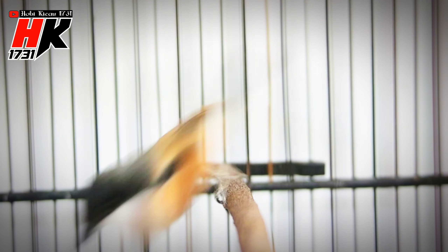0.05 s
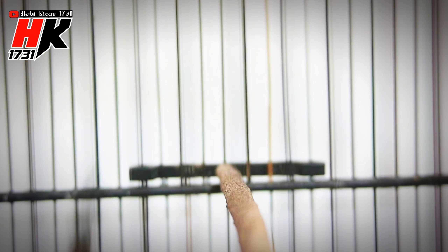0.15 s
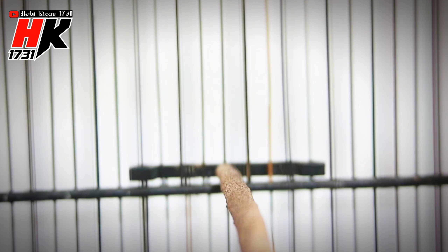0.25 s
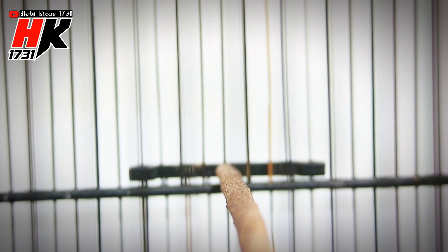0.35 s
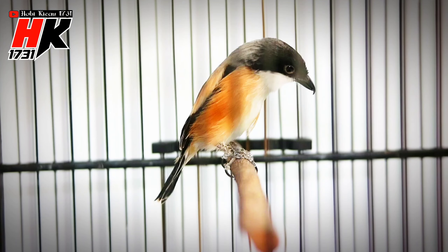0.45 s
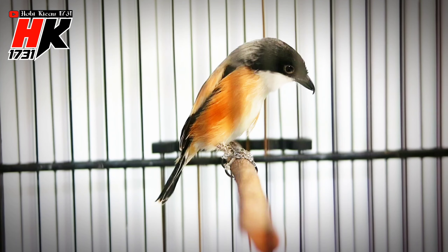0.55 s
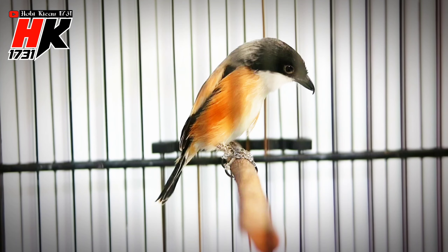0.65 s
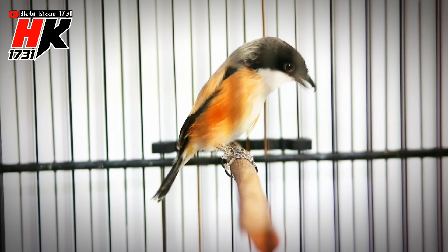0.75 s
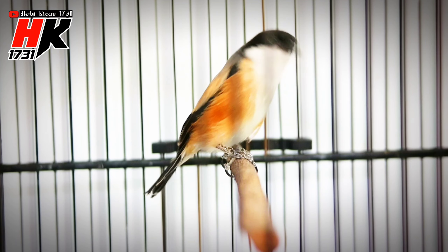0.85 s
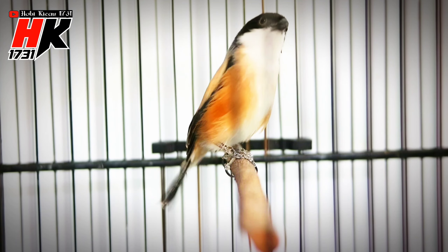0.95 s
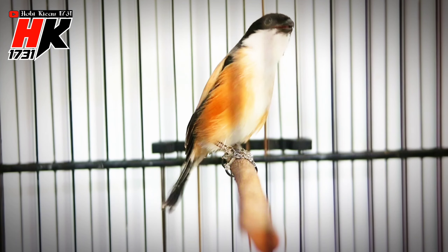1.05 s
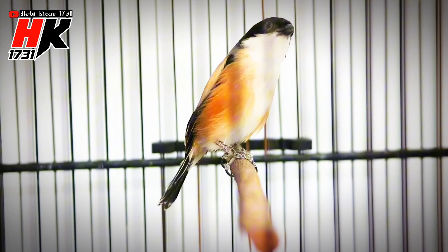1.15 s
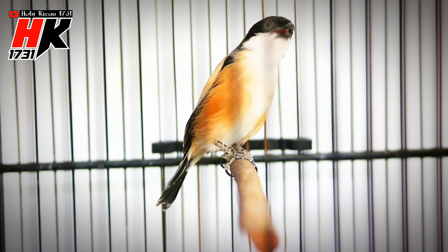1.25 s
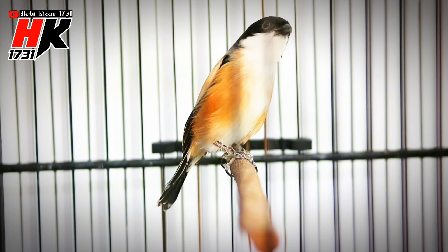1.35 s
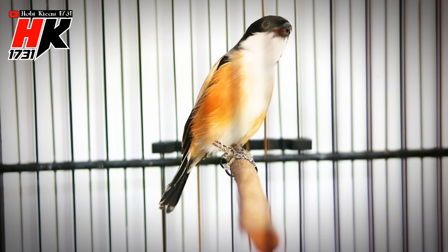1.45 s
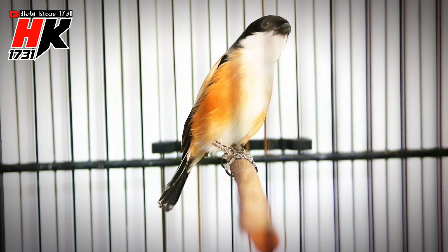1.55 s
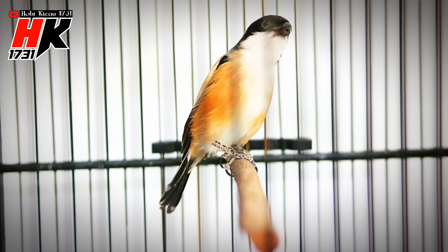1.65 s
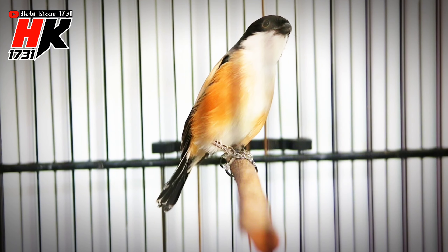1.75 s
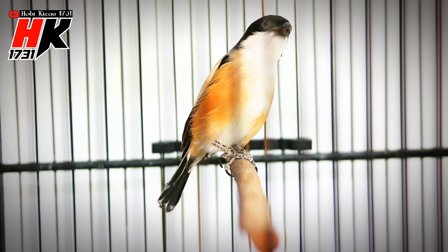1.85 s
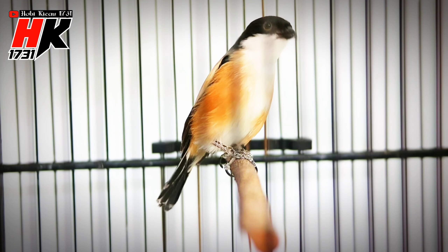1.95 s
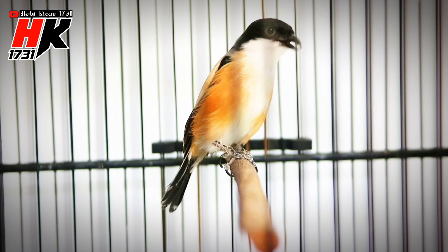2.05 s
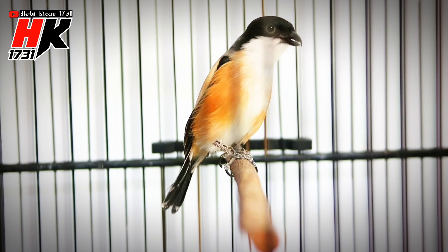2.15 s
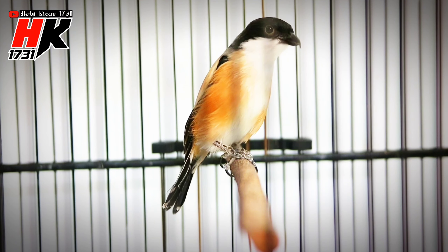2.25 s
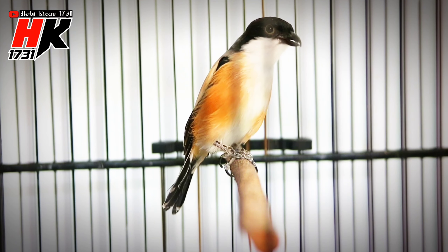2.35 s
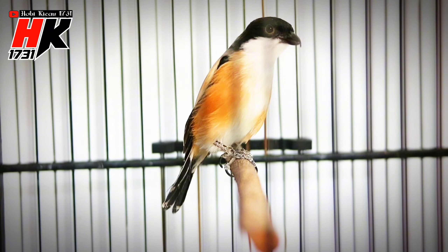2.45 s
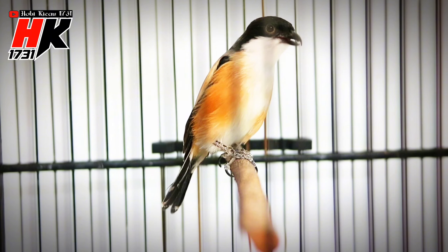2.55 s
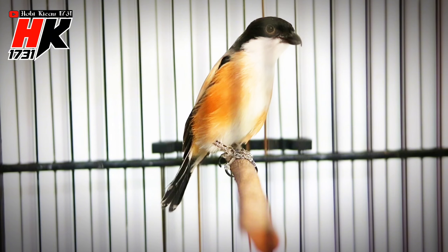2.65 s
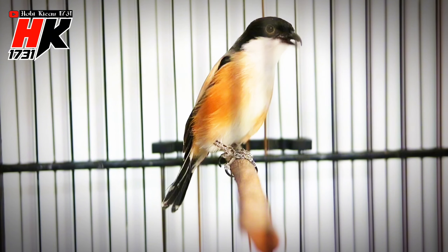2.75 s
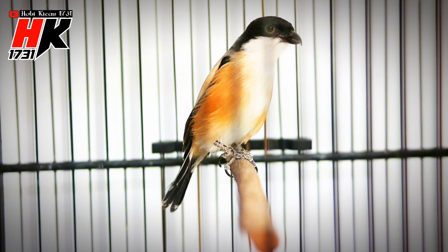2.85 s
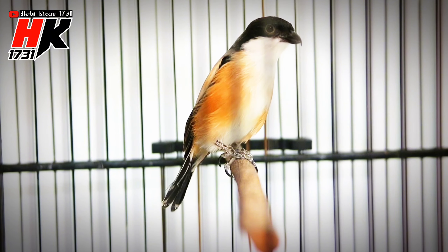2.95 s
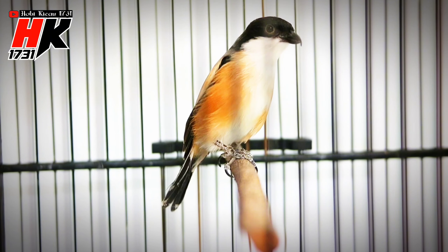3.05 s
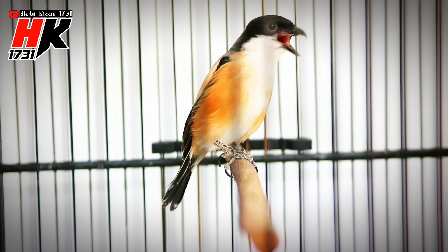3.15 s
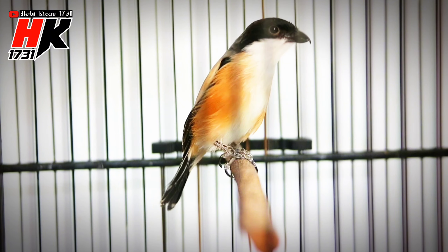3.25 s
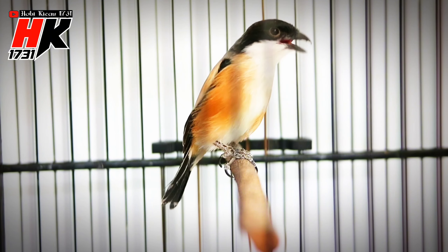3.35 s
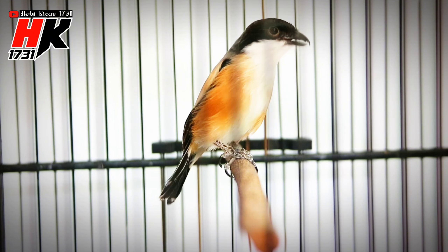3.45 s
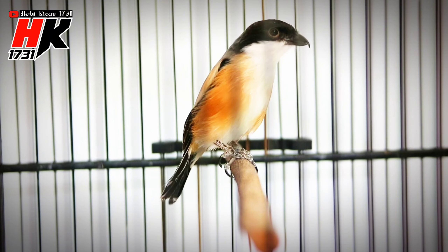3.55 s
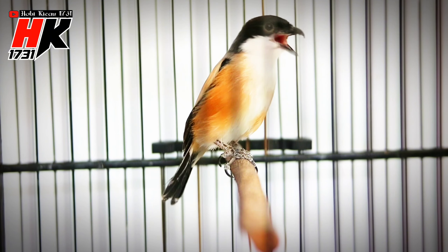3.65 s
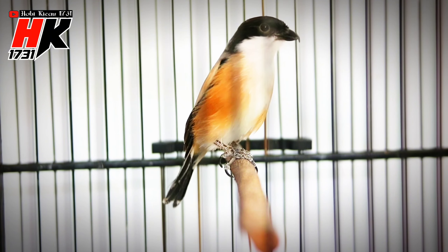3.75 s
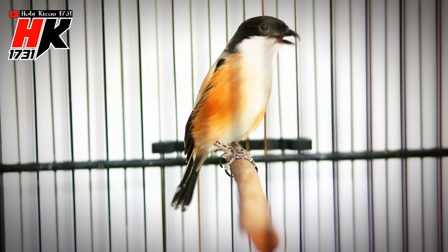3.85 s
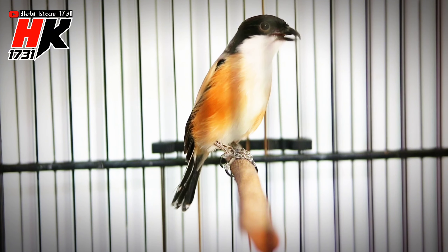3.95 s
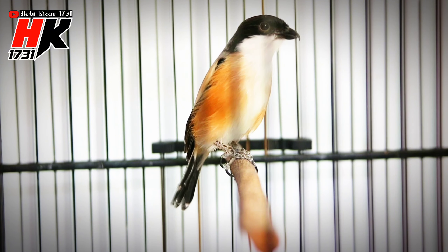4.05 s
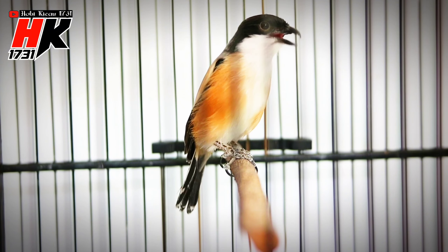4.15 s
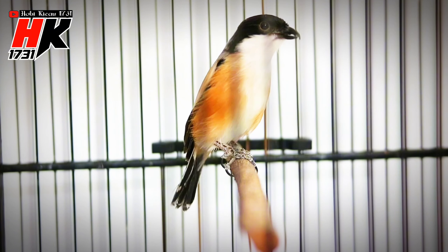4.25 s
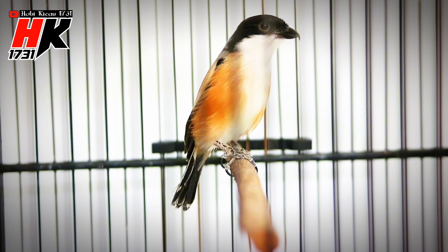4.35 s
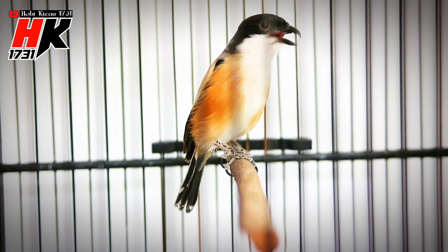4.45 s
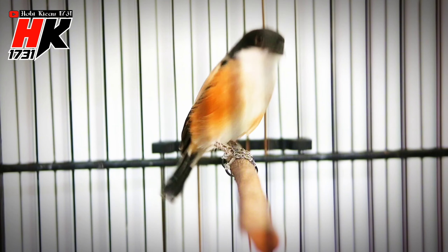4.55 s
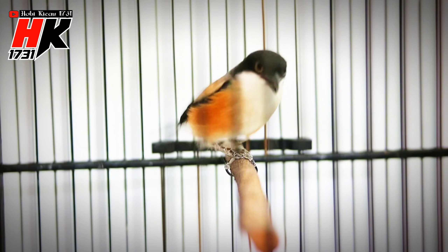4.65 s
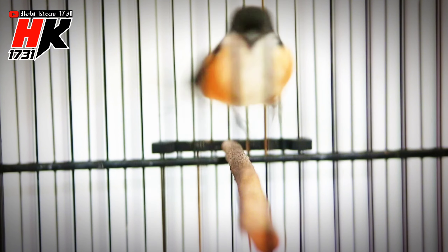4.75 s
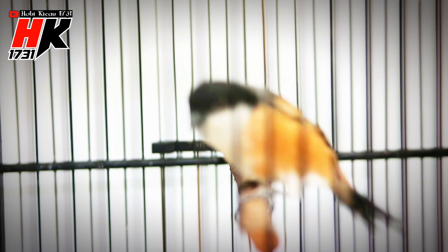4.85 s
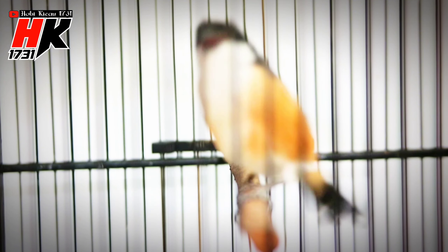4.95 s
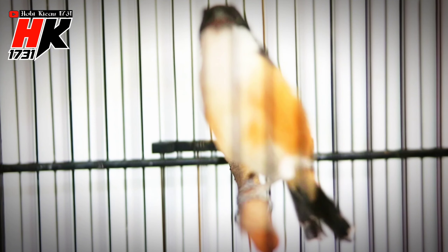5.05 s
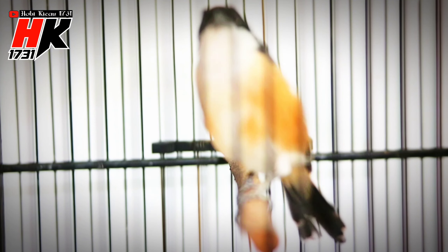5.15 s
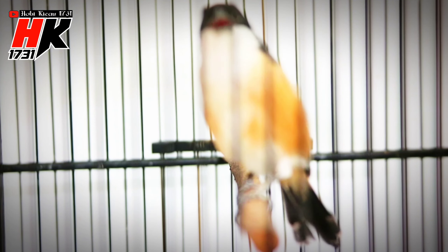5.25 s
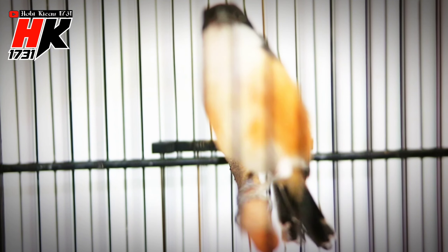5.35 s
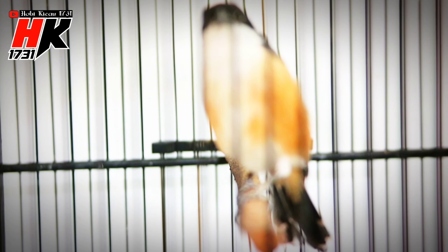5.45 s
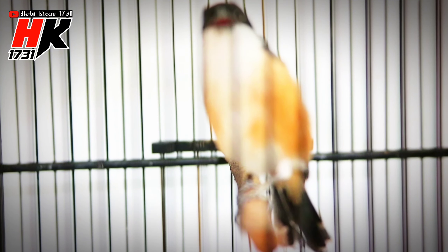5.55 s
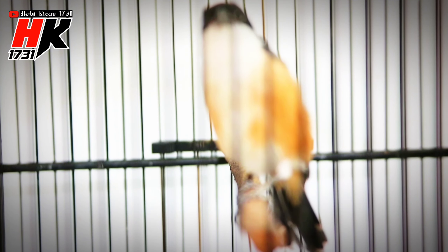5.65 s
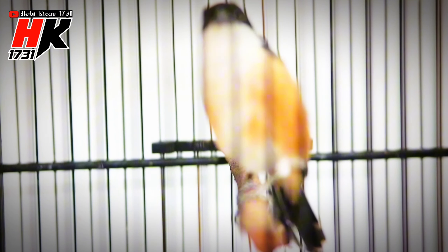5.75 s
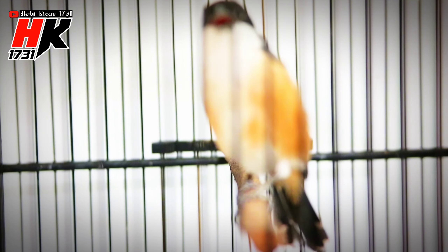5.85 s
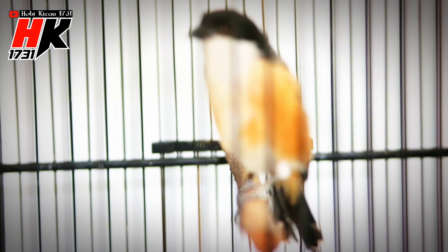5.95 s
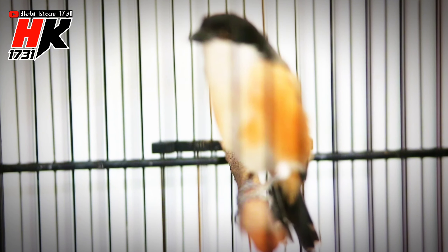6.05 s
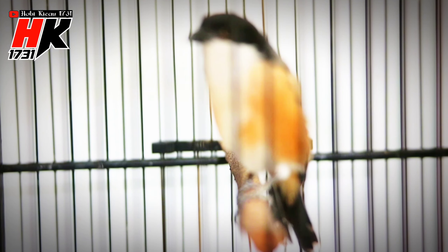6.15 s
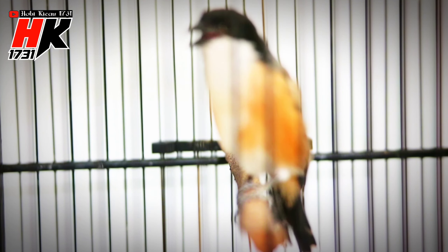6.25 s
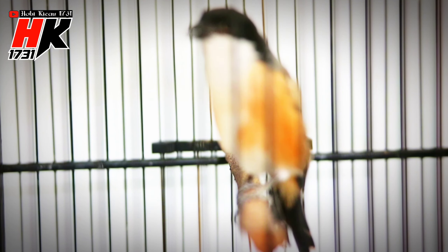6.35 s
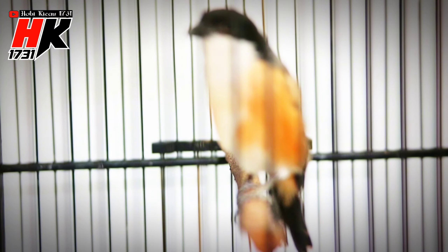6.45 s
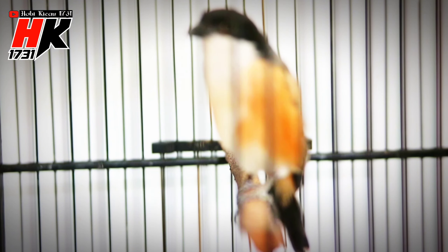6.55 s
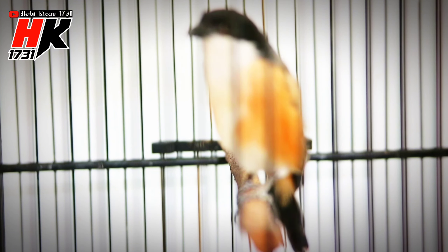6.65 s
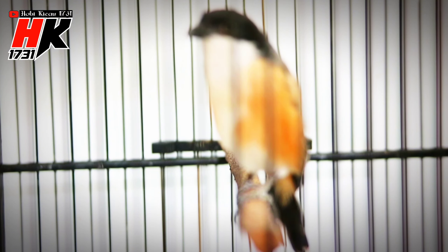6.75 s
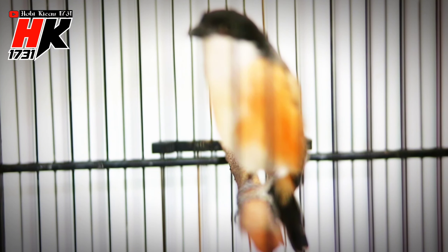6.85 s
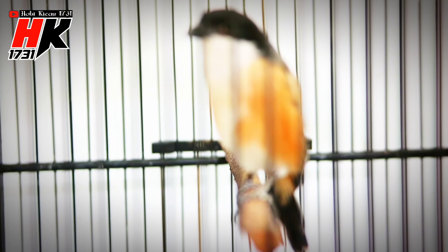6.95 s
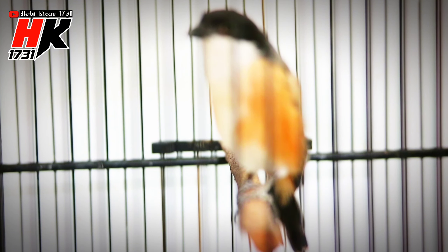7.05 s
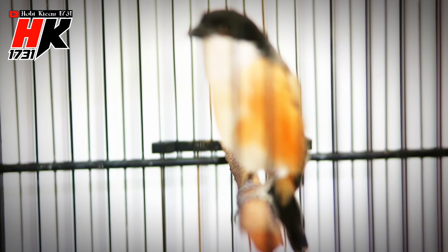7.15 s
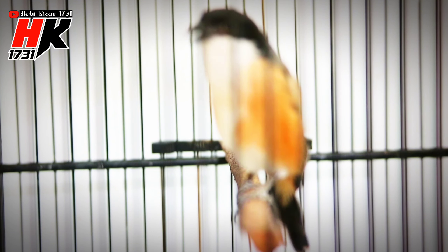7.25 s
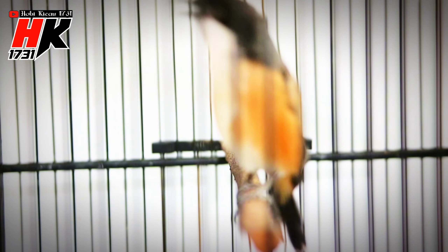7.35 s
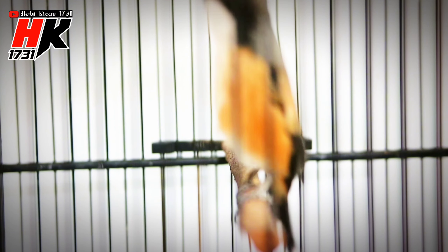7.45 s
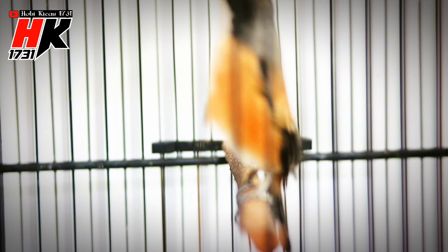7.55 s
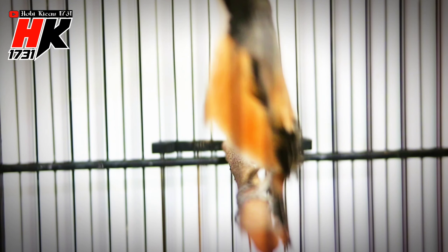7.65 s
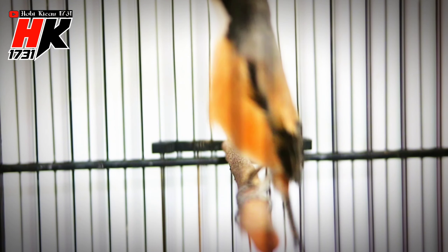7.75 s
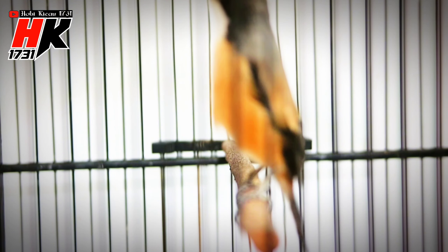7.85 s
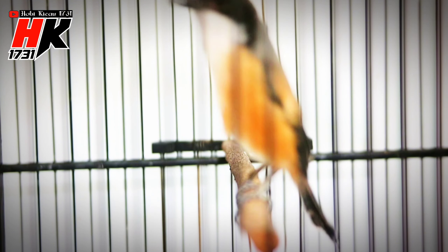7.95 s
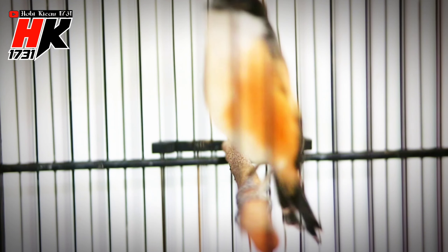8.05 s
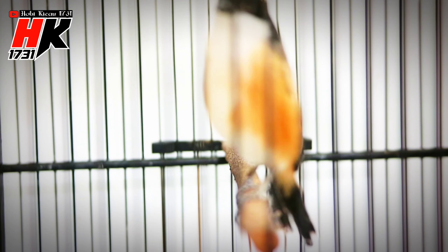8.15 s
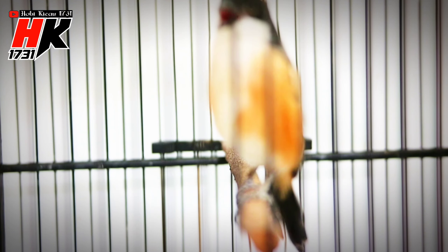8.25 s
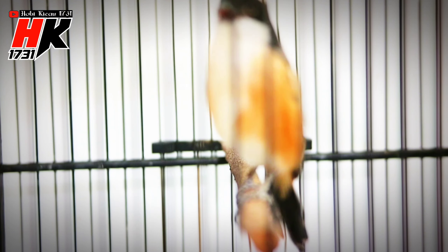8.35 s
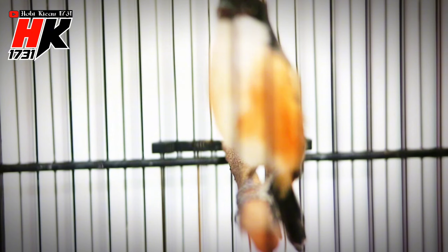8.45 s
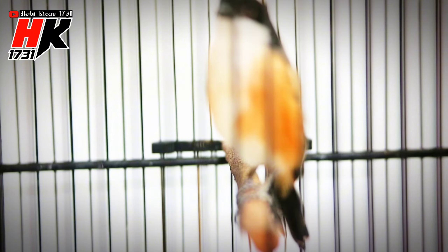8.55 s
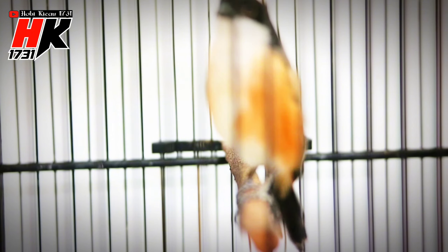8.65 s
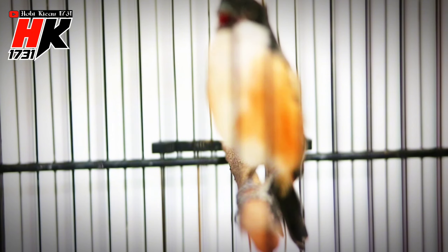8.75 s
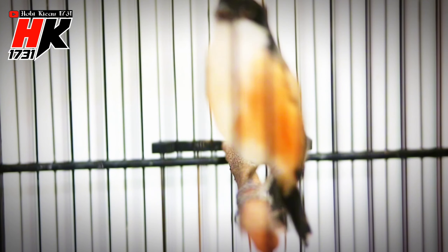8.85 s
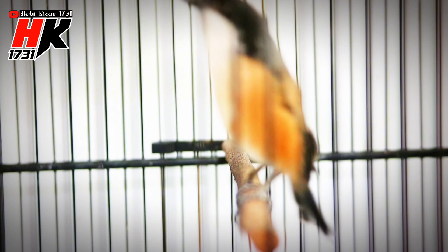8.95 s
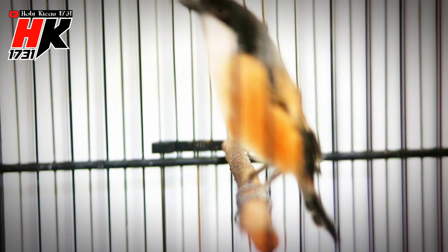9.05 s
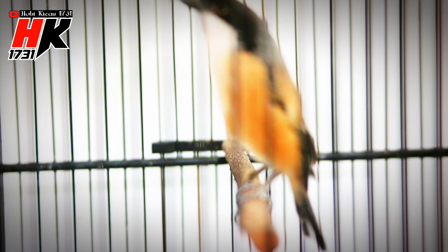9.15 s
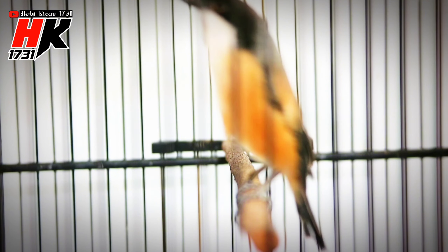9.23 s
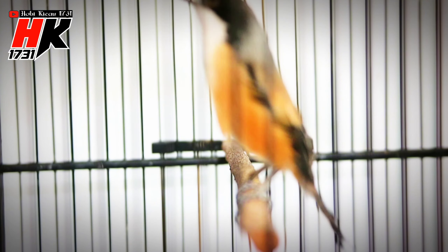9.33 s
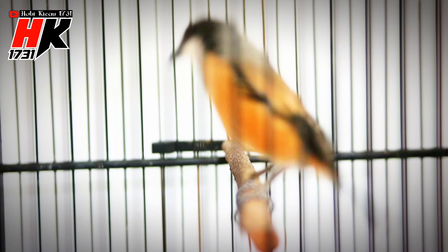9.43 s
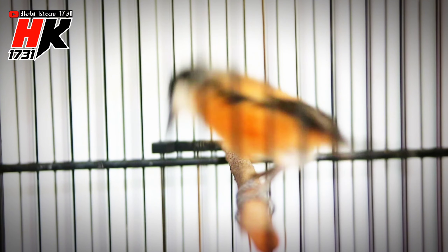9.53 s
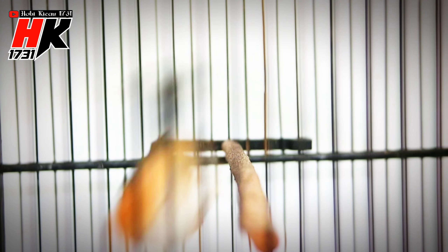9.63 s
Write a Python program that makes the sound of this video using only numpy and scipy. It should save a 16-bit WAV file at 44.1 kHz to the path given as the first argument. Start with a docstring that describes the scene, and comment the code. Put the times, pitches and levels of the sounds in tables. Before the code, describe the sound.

A caged shrike chatters loud falling yelps, alternates clear notes with harsh rasps, then whistles high with rough chucks in a small lively room.

```python
"""A shrike sings in a wire cage in a small, lively room, over the murmur of distant traffic.
After a squeak and a few dry ticks it chatters falling yelps, alternates clear notes with harsh rasps,
pauses, then gives long whistles, most of which end in a rough chuck, and closes on short slurs.
The voice is harmonic synthesis with irregular cycles, shaped by throat and beak; the ticks are noise bursts.
A room response surrounds the bird; filtered noise makes traffic and hiss, and sines make a motor's hum."""
import sys
import numpy as np
from scipy import signal
from scipy.fft import rfft, irfft, next_fast_len
from scipy.io import wavfile
from scipy.ndimage import uniform_filter1d, minimum_filter1d

SR = 44100
rng = np.random.default_rng(int(sys.argv[2]) if len(sys.argv) > 2 else 0)


def int16_out(signal):
    """Quantize to a 16-bit WAV file."""
    q = np.round(np.clip(np.atleast_2d(signal).T, -1, 1) * 32767)
    wavfile.write(sys.argv[1], SR, q.astype(np.int16))


N = 427329
TIME = np.arange(N) / SR
CUTOFF_HZ = 15700   # no harmonic is made above this, and the final filter cuts here


def from_db(db):
    """Level law: 20 dB is a factor of ten in amplitude."""
    return 10 ** (np.asarray(db) / 20)


def rms_one(x):
    """Power normalisation to rms 1."""
    return x / np.sqrt(np.mean(x ** 2) + 1e-20)


def at_hz(points, hz):
    """Logarithmic frequency scale: read a (f/Hz, value) table by linear interpolation in log f."""
    known_hz, values = np.transpose(points)
    return np.interp(np.log(np.maximum(hz, 1)), np.log(known_hz), values)


def noise(colour, size):
    """Spectral shaping: white noise weighted by a spectrum, rms 1."""
    padded = next_fast_len(size)
    white = rfft(rng.standard_normal(padded))
    weights = from_db(at_hz(colour, np.fft.rfftfreq(padded, 1 / SR)))
    return rms_one(irfft(white * weights, padded)[:size])


def flutter(rate_hz, size):
    """Band-limited random modulation: low-passed noise of rms 1, slower than about rate_hz."""
    low_pass = signal.butter(2, min(rate_hz, SR / 4), fs=SR, output="sos")
    settled = signal.sosfilt(low_pass, rng.standard_normal(2 * size))[size:]
    return rms_one(settled)


def add(track, start_s, sound):
    """Linear superposition of a sound on a track."""
    start = max(int(start_s * SR), 0)
    track[start:start + len(sound)] += sound[:max(N - start, 0)]


def ramp(age, start_s, length_s):
    """Linear transition from 0 to 1 over length_s."""
    return np.clip((age - start_s) / max(length_s, .001), 0, 1)


def note_clock(length_s):
    """Local time base: time since a note's start, with a margin for its fade in and out."""
    return np.arange(-.003, length_s + .006, 1 / SR)


def membrane(pitch, rough, throat, jitter, shimmer_db, chaos_hz, tripling):
    """Self-oscillation of one side of the syrinx: harmonics whose cycles turn irregular as it roughens."""
    size = len(pitch)
    unsteady = pitch * (1 + jitter * rough * flutter(chaos_hz, size) + 0.0061 * flutter(120, size))
    phase = 2 * np.pi * np.cumsum(unsteady) / SR
    # cycles group in threes, which puts side tones between the harmonics
    grouping = np.sin(phase / 3 + .7 * flutter(150, size))
    phase = phase + tripling * np.minimum(rough, .4) * grouping
    order = np.arange(1, 10)[:, None]
    weights = from_db(at_hz(throat, order * pitch)) * (order * pitch < CUTOFF_HZ)
    # roughness smothers the upper harmonics
    weights = weights * from_db(-5 * rough * (order > 2))
    tone = np.sum(weights * np.sin(order * phase), axis=0) / np.sqrt(np.sum(weights ** 2, axis=0) / 2)
    shimmer = from_db(shimmer_db * rough * np.tanh(flutter(chaos_hz, size)))
    # keep the mean power over 10 ms unchanged
    return tone * shimmer / np.sqrt(uniform_filter1d(shimmer ** 2, size=441))


def song(notes, throat, jitter, shimmer_db, chaos_hz, tripling, rasp, second_ratio, second_db):
    """Source-filter principle: two syrinx sides and turbulent air, both shaped by throat and beak.

    Roughness brings in the lower-pitched second side and the air."""
    out = np.zeros(N)
    for t, pitch, level_db, rough, gape_db in notes:
        rough = np.clip(rough, 0, 1)
        # a wide beak lets the upper harmonics out
        tract = [(hz, db + gape_db * np.clip(np.log2(hz / 3900) * 2, 0, 2)) for hz, db in throat]
        first = membrane(pitch, rough, tract, jitter, shimmer_db, chaos_hz, tripling)
        second = membrane(pitch * second_ratio, rough, tract, jitter, shimmer_db, chaos_hz, tripling)
        second_share = from_db(second_db) * rough ** 2
        air_share = rasp * rough
        # turbulent air is brighter than the tone and comes in uneven puffs
        hiss = [(hz, db + 6 * (hz > 5000)) for hz, db in tract]
        puffs = from_db(6 * np.tanh(flutter(350, len(t))))
        air = rms_one(noise(hiss, len(t)) * puffs)
        voice = first + second_share * second + air_share * air
        voice = voice / np.sqrt(1 + second_share ** 2 + air_share ** 2)
        gate = np.clip((t - t[0]) / 0.0056, 0, 1) * np.clip((t[-1] - t) / 0.0097, 0, 1)
        add(out, t[0], voice * from_db(level_db) * np.sin(np.pi / 2 * gate) ** 2)
    # so small a beak radiates almost no bass
    return signal.sosfilt(signal.butter(4, 1250, "high", fs=SR, output="sos"), out)


YELP_ATTACK_DB, YELP_ACCENT_S, YELP_ACCENT_DB, YELP_FADE_DB_PER_S = 14, 0.0087, 6.5, 108.5
YELP_SCOOP_S, YELP_FALL_ROUGH, YELP_BREAK_S = 0.0219, .44, .02


def yelp(s, attack_s, hold_s, fall_s, hz, scoop, fall_octaves, peak_db, hold_rough, gape_db):
    """Exponential glide: an accented tone scoops up, holds, then tumbles down and roughens."""
    age = note_clock(hold_s + fall_s)
    scooped = 1 - scoop * (1 - ramp(age, 0, YELP_SCOOP_S))
    pitch = hz * scooped * 2 ** (-fall_octaves * ramp(age, hold_s, fall_s))
    level_db = (peak_db - YELP_ATTACK_DB * (1 - ramp(age, 0, attack_s))
                - YELP_ACCENT_DB * ramp(age, attack_s, YELP_ACCENT_S)
                - YELP_FADE_DB_PER_S * np.maximum(age - attack_s, 0))
    broken = ramp(age, hold_s - YELP_BREAK_S / 2, YELP_BREAK_S)
    return s + age, pitch, level_db, hold_rough + (YELP_FALL_ROUGH - hold_rough) * broken, gape_db


SAG_AT_S, SAG_WIDTH_S = 0.0195, 0.0175
CLEAR_ATTACK_DB, CLEAR_FADE_DB_PER_S, FRAY_LOSS_DB = 10.5, 32.5, 3
CLEAR_ROUGH, FRAY_S = 0.074, 0.018


def clear_note(s, attack_s, clear_s, frayed_s, hz, sag, last_hz, db, frayed_rough, gape_db):
    """Near-periodic oscillation: a held, clean tone sags briefly, then slides with a frayed end."""
    age = note_clock(clear_s + frayed_s)
    sagged = 1 - sag * np.exp(-((age - SAG_AT_S) / SAG_WIDTH_S) ** 2)
    pitch = hz * sagged + (last_hz - hz) * ramp(age, clear_s, frayed_s)
    frayed = ramp(age, clear_s, FRAY_S)
    level_db = (db - CLEAR_ATTACK_DB * (1 - ramp(age, 0, attack_s))
                - CLEAR_FADE_DB_PER_S * age - FRAY_LOSS_DB * frayed)
    return s + age, pitch, level_db, CLEAR_ROUGH + (frayed_rough - CLEAR_ROUGH) * frayed, gape_db


# All song levels are those at the bird, before the room; gape is treble/dB, acting above 3.9 kHz.
# Falling yelps: start t/s, attack t/s, onset to fall t/s, fall t/s, held f/Hz, scoop [share of f],
# fall [octaves], peak level/dB, roughness of the hold [0-1], gape/dB
FALLING_YELPS = [ (0.835, 0.012, .025, 0.046, 1867, .02, 0.4, -4, .06, 0),
                 (1.054, 0.044, 0.053, .031, 1837, 0.018, 0.39, -4.5, 0.09, 1.5),
                 (1.275, 0.017, 0.034, .04, 1861, 0.094, 0.51, -3.5, 0.07, 1.5),
                 (1.492, .019, 0.032, 0.046, 1723, 0.044, .4, -3.5, 0.19, 2.5),
                 (1.711, 0.0075, 0.043, 0.04, 1616, .07, 0.33, -3.5, 0.24, 1),
                 (1.933, 0.012, 0.044, 0.044, 1544, 0.045, 0.34, -4.5, .19, 1),
                 (2.151, 0.012, 0.052, 0.028, 1533, 0.046, 0.29, -4.5, 0.15, -0.5),
                 (2.376, 0.015, 0.043, 0.041, 1539, 0.044, 0.31, -4.5, 0.18, -0.5),
                 (2.608, 0.012, 0.046, 0.036, 1537, 0.042, .33, -4, .19, -1),
                 (2.832, 0.0091, 0.045, .037, 1520, 0.045, 0.31, -4.5, 0.2, -1), ]
# Clear notes: start t/s, attack t/s, clear t/s, frayed t/s, f/Hz, sag [share of f], last f/Hz,
# level/dB, roughness of the frayed end [0-1], gape/dB
HELD_NOTES = [ (3.16, 0.018, .022, 0.081, 1935, 0.036, 2064, -7, 0.54, 4.5),
              (3.428, 0.023, 0.065, 0.019, 1886, 0.038, 1550, -9.5, 0.18, 4),
              (3.671, 0.03, 0.075, 0.017, 1885, .075, 1670, -9.5, 0.17, 3),
              (4.193, 0.0087, 0.076, 0.024, 1552, 0.0033, 1470, -8.5, 0.5, -1.5),
              (4.735, 0.015, .076, .027, 1595, 0.0196, 1443, -10, 0.24, 0),
              (5.298, 0.013, .076, 0.038, 1539, 0.0031, 1360, -12, 0.19, 2),
              (5.888, 0.0093, 0.077, 0.037, 1564, 0.036, 1413, -10, 0.26, 1.5), ]
# Throat and beak response for high yelps and clear notes: f/Hz, level/dB
OPEN_THROAT = [(1200, -16.5), (1550, -23.5), (1900, -26), (2300, -34.5), (2750, 2), (3100, -0.5),
               (3900, -5), (4650, -9.5), (5500, -21.5), (6300, -24.5), (7500, -23.5), (9700, -49),
               (11800, -42.5), (15500, -69.5)]
# Darker throat and beak response for low yelps: f/Hz, level/dB
DARK_THROAT = [(1200, -11.5), (1550, -22.5), (2000, -9), (2500, 2), (3050, -3.5), (3700, -8), (4600, -20),
               (5400, -25.5), (7600, -29.5), (9500, -65), (12000, -46), (15500, -58)]
LOW_YELP_HZ = 1570   # below this the throat takes the darker shape


def chatter():
    """Vocal-tract resonance: yelps and clear notes, the low yelps through a darker throat."""
    high_yelps = [yelp(*row) for row in FALLING_YELPS if row[4] >= LOW_YELP_HZ]
    low_yelps = [yelp(*row) for row in FALLING_YELPS if row[4] < LOW_YELP_HZ]
    clear_notes = [clear_note(*row) for row in HELD_NOTES]
    bright = song(high_yelps + clear_notes, OPEN_THROAT, jitter=.05, shimmer_db=8, chaos_hz=450,
                  tripling=.55, rasp=.4, second_ratio=.78, second_db=-5)
    dark = song(low_yelps, DARK_THROAT, jitter=.055, shimmer_db=8, chaos_hz=500,
                tripling=.85, rasp=.5, second_ratio=.83, second_db=-6)
    return bright + dark


SCOLD_ATTACK_S, SCOLD_ATTACK_DB, SCOLD_HOLD_S, SCOLD_FADE_DB_PER_S = 0.021, 7, 0.037, 127.5
SCOLD_ROUGH, SCOLD_ROUGHENS_PER_S = 0.4, 6.7
SCOLD_RASP_HZ, SCOLD_SWEEP_S = 1979, 0.00906


def scold(s, length_s, first_hz, sweep_at_s, peak_db, gape_db):
    """Loss of periodicity: a voiced start sweeps up into a rasp that roughens as it fades."""
    age = note_clock(length_s)
    swept = (1 + np.tanh((age - sweep_at_s) / SCOLD_SWEEP_S)) / 2
    pitch = first_hz + (SCOLD_RASP_HZ - first_hz) * swept
    level_db = (peak_db - SCOLD_ATTACK_DB * (1 - ramp(age, 0, SCOLD_ATTACK_S))
                - SCOLD_FADE_DB_PER_S * np.maximum(age - SCOLD_HOLD_S, 0))
    return s + age, pitch, level_db, SCOLD_ROUGH + SCOLD_ROUGHENS_PER_S * age, gape_db


# Scolds: start t/s, length t/s, first f/Hz, middle of sweep after t/s, peak level/dB, gape/dB
RASPING_SCOLDS = [(3.936, 0.12, 1693, .03, -10, -2.5), (4.473, 0.12, 1600, .02, -10, -3),
                  (5.009, 0.11, 1667, .028, -10.5, -1.5), (5.598, .112, 1625, .024, -8.5, -1.5),
                  (6.289, 0.12, 1615, 0.025, -9, -2.5)]
# Throat and beak response while scolding: f/Hz, level/dB
RASP_THROAT = [(1200, -65), (1700, -18), (2200, -30.5), (2850, 8.5), (3300, -3), (3950, 2), (4500, -0.5),
               (5400, -20.5), (7300, -8.5), (8500, -24.5), (10000, -51.5), (12000, -30), (15500, -66.5)]


def scolding():
    """Chaotic oscillation: the harsh rasps, strongly shimmering and with a strong second side."""
    return song([scold(*row) for row in RASPING_SCOLDS], RASP_THROAT, jitter=.035, shimmer_db=11,
                chaos_hz=330, tripling=.3, rasp=.45, second_ratio=.73, second_db=-2)


LEAP_FROM, LEAP_OVER, LEAP_S, SETTLE_S = .47, 1.14, 0.021, .041   # pitch ratios; times from the start
LEAP_ROUGH, WHISTLE_ROUGH, BOW_LOWEST_S = 0.714, 0.083, .122
LEAP_ATTACK_DB, SWELL_S, WHISTLE_RELEASE_DB = 9, 0.045, 14


def whistle(s, length_s, hz, bow, leap_db, lull_db, swell_at_s, swell_db, last_rough, gape_db):
    """Pitch overshoot: a rough leap settles on a purer, bowed tone that lulls, swells and lets go."""
    age = note_clock(length_s)
    leap = np.interp(age, [0, LEAP_S, SETTLE_S], [LEAP_FROM, LEAP_OVER, 1])
    pitch = hz * leap * (1 + bow * (age - BOW_LOWEST_S) ** 2)
    released = ramp(age, swell_at_s, length_s - swell_at_s)
    level_db = (leap_db - LEAP_ATTACK_DB * (1 - ramp(age, 0, LEAP_S))
                + (lull_db - leap_db) * ramp(age, SETTLE_S, SWELL_S)
                + (swell_db - lull_db) * ramp(age, swell_at_s - SWELL_S, SWELL_S)
                - WHISTLE_RELEASE_DB * released)
    rough = np.interp(age, [LEAP_S, SETTLE_S], [LEAP_ROUGH, WHISTLE_ROUGH])
    rough = rough + (last_rough - WHISTLE_ROUGH) * released
    return s + age, pitch, level_db, rough, gape_db


DIVE_TOP_HZ, DIVE_BOTTOM_HZ, DIVE_ARCH_DB, DIVE_ROUGH = 4400, 2374, 17.5, 0.523
REBOUND_RISE_S, REBOUND_SAG_HZ_PER_S = .017, 10460
REBOUND_FADE_DB_PER_S, REBOUND_ROUGH = 166, 0.38


def chuck(s, dive_s, rebound_s, rebound_hz, dive_db, rebound_db, gape_db):
    """Rapid frequency modulation: a loud dive, then a rebound that sags and fades."""
    age = note_clock(dive_s + rebound_s)
    dived, risen = ramp(age, 0, dive_s), ramp(age, dive_s, REBOUND_RISE_S)
    after_s = np.maximum(age - dive_s - REBOUND_RISE_S, 0)
    pitch = (DIVE_TOP_HZ + (DIVE_BOTTOM_HZ - DIVE_TOP_HZ) * dived
             + (rebound_hz - DIVE_BOTTOM_HZ) * risen - REBOUND_SAG_HZ_PER_S * after_s)
    dive_level_db = dive_db - DIVE_ARCH_DB * np.abs(2 * dived - 1)
    level_db = dive_level_db * (1 - risen) + rebound_db * risen - REBOUND_FADE_DB_PER_S * after_s
    return s + age, pitch, level_db, DIVE_ROUGH + (REBOUND_ROUGH - DIVE_ROUGH) * risen, gape_db


SLUR_EASE, SLUR_ARCH_DB = 2.1, 8


def slur(s, length_s, first_hz, last_hz, peak_db, rough, gape_db):
    """Decelerating glide: quick at first and loudest in the middle."""
    age = note_clock(length_s)
    done = ramp(age, 0, length_s)
    pitch = last_hz + (first_hz - last_hz) * (1 - done) ** SLUR_EASE
    level_db = peak_db - SLUR_ARCH_DB * (2 * done - 1) ** 2
    return s + age, pitch, level_db, np.full(len(age), rough), gape_db


# Long whistles: start t/s, length t/s, lowest f/Hz once settled, bow [share of f per s^2],
# leap level/dB, lull level/dB, swell complete after t/s, swell level/dB, last roughness [0-1], gape/dB
LONG_WHISTLES = [ (7.314, 0.15, 3864, 4.6, -13, -19, .146, -5.5, 0.17, -0.5),
                 (7.78, 0.2, 4130, 13.1, -16.5, -18, 0.13, -14.5, 0, -2),
                 (8.271, 0.15, 4086, 11.1, -14.5, -17.5, 0.14, -11.5, 0.2, -1.5),
                 (8.744, .174, 4066, 13, -17, -21.5, 0.13, -11, 0.05, -1),
                 (9.324, 0.21, 3289, 6.5, -20, -30, 0.14, -6.5, 0.56, -3), ]
# Chucks: start t/s, dive t/s, rebound t/s, rebound f/Hz, dive level/dB, rebound level/dB, gape/dB
ROUGH_CHUCKS = [ (7.494, 0.035, 0.043, 2875, -6.5, -10.5, 0), (7.968, 0.027, 0.057, 3648, -5, -10.5, -2),
                (8.453, .026, .055, 3510, -5, -10.5, -1.5), (8.928, 0.029, 0.039, 3603, -3.5, -10, -1.5), ]
# Slurs: start t/s, length t/s, first f/Hz, last f/Hz, peak level/dB, roughness [0-1], gape/dB
SHORT_SLURS = [(6.825, 0.05, 2800, 2405, -31.5, 0.8, 7), (9.543, .04, 2470, 2300, -21.5, 0.83, -14),
               (9.591, .031, 1663, 3770, -8, 0.23, -5)]
# Throat and beak response while whistling: f/Hz, level/dB
PURE_THROAT = [(1400, -75), (2300, 18.5), (3000, 25.5), (4200, 7), (5200, 2.5), (6500, 1), (8300, -10),
               (10000, -24.5), (12200, -21.5), (15500, -65)]


def whistling():
    """Resonance near the fundamental: whistles, chucks and slurs with weak upper harmonics."""
    notes = [whistle(*row) for row in LONG_WHISTLES]
    notes += [chuck(*row) for row in ROUGH_CHUCKS]
    notes += [slur(*row) for row in SHORT_SLURS]
    return song(notes, PURE_THROAT, jitter=0.135, shimmer_db=1, chaos_hz=530,
                tripling=0, rasp=0.21, second_ratio=0.6, second_db=-15.0)


# Contour of the opening squeak: t/s, f/Hz, level/dB, roughness [0-1]
SQUEAK_CONTOUR = [(.003, 2650, -27, 0.25), (.018, 2834, -16, 0.81), (.028, 3093, -6, 0.04),
                  (0.037, 2915, -15, 0.28), (.048, 2820, -18, 0.32)]
# Throat and beak response for the squeak: f/Hz, level/dB
SHRILL_THROAT = [(1500, -41), (3000, -18), (4300, -46), (6000, -5), (7500, -21), (9000, -26.5),
                 (12000, -42), (15500, -47)]


def squeak():
    """Frequency modulation: a brief, shrill arch of pitch."""
    s, *columns = np.transpose(SQUEAK_CONTOUR)
    t = s[0] + note_clock(s[-1] - s[0])
    note = (t, *[np.interp(t, s, column) for column in columns], 0)
    return song([note], SHRILL_THROAT, jitter=0.065, shimmer_db=7.0, chaos_hz=507,
                tripling=0, rasp=0.24, second_ratio=0.97, second_db=-29)


# Dry ticks: t/s of the peak, envelope peak level/dB before the room, decay time constant t/s
BILL_TICKS = [(.476, -28.5, 0.017), (.49, -20, 0.0034), (0.612, -12.5, 0.0027), (.732, -18.5, .003)]
# Spectrum of a tick: f/Hz, level/dB
TICK_SPECTRUM = [(300, -46), (1200, -16), (2000, -15), (3800, -6.5), (5400, -4.5), (6500, -10),
                 (8300, -12.5), (10000, -20), (12500, -28), (15500, -57)]


def ticks():
    """Impulsive excitation: very short toneless bursts from the bill."""
    out, t = np.zeros(N), np.arange(SR // 10) / SR
    lead_s = .01   # room for the rise before each peak
    for s, peak_db, decay_s in BILL_TICKS:
        rise, decay = np.exp((t - lead_s) / (.3 * decay_s)), np.exp((lead_s - t) / decay_s)
        add(out, s - lead_s, from_db(peak_db) * np.minimum(rise, decay) * noise(TICK_SPECTRUM, len(t)))
    return out


# Reverberation time of the diffuse tail, the time to fall 60 dB: f/Hz, t/s
REVERBERATION = [(1000, 0.64), (3200, 0.62), (6000, 0.48), (9000, 0.32), (15000, 0.67)]


def room(x, direct_db, early_db, early_t60, tail_db, lag_s):
    """Reverberation: direct sound, quick scatter from nearby surfaces and a diffuse tail.

    Scatter and tail differ at each microphone; the direct sound reaches the right one lag_s late."""
    t = np.arange(int(.8 * SR)) / SR
    edges = np.geomspace(700, 16000, num=9)
    heard = []
    for side in range(2):
        tail = 0
        for low, high in zip(edges, edges[1:]):
            band_pass = signal.butter(2, [low, high], "band", fs=SR, output="sos")
            band = signal.sosfilt(band_pass, rng.standard_normal(len(t)))
            tail = tail + band * from_db(-60 * t / at_hz(REVERBERATION, np.sqrt(low * high)))
        tail *= np.clip((t - .006) / 0.0077, 0, 1)
        # sparse random reflections, about 900 per second
        arrivals = (rng.random(len(t)) < 900 / SR) * (t > .001)
        early = rng.standard_normal(len(t)) * arrivals * from_db(-60 * t / early_t60)
        response = from_db(tail_db) * tail / np.linalg.norm(tail)
        response = response + from_db(early_db) * early / np.linalg.norm(early)
        direct = np.interp(TIME - side * lag_s, TIME, x)
        heard.append(from_db(direct_db) * direct + signal.fftconvolve(x, response)[:N])
    return np.array(heard)


def wide_noise(colour, left_db):
    """Diffuse field: noise unrelated at the two microphones, left_db louder on the left."""
    return np.array([noise(colour, N), noise(colour, N)]) * from_db([[left_db / 2], [-left_db / 2]])


# Spectrum of the distant traffic: f/Hz, level/dB per Hz
TRAFFIC_SPECTRUM = [(20, -2.5), (45, -3), (90, 1), (140, 8), (230, 2), (380, 4.5), (600, -2), (1000, -7),
                    (2000, -13), (5000, -51.5)]
# Level of the low background rumble, which drops abruptly, often just after a loud note, then climbs
# back: t/s, level/dB before the gain, random drift and left-right balance
RUMBLE_LEVELS = [(0.0, -48), (0.05, -59.5), (0.83, -35), (0.89, -50), (1.67, -42.5), (3.18, -40.5),
                 (3.21, -49.5), (4.1, -50.5), (4.21, -41.5), (5.05, -43.5), (5.1, -54.5), (5.56, -36),
                 (5.69, -49), (6.21, -34), (6.4, -51), (6.69, -39), (9.28, -38.5), (9.69, -42)]
TRAFFIC_GAIN_DB = -0.85


def traffic():
    """Spectrally shaped noise: a low rumble drops abruptly and climbs back, with a small random drift."""
    level_db = np.interp(TIME, *np.transpose(RUMBLE_LEVELS)) + TRAFFIC_GAIN_DB + 2.0 * flutter(5.7, N)
    return from_db(level_db) * wide_noise(TRAFFIC_SPECTRUM, left_db=7)


# Spectrum of the hiss: f/Hz, level/dB per Hz
AIR_SPECTRUM = [(100, -11), (600, 2), (1200, 2), (2200, 1.5), (4000, -5.5), (7000, -15), (9000, -28.5),
                (12000, -32), (15500, -43)]
# Level of the hiss, which rises, steps up near 0.46 s, then changes slowly:
# t/s, level/dB before the left-right balance
AIR_LEVELS = [(0, -51.5), (.45, -46), (.48, -43.5), (5, -47.5), (9.69, -46)]


def air_hiss():
    """Broadband noise: a diffuse hiss rises, steps up near 0.46 s, then changes slowly in level."""
    return from_db(np.interp(TIME, *np.transpose(AIR_LEVELS))) * wide_noise(AIR_SPECTRUM, left_db=5.5)


# Tones of a motor: f/Hz, rms level/dB before the left-right balance
MOTOR_TONES = [(134, -62.5), (200, -59), (474, -56.5), (592, -60.5)]


def motor_hum():
    """Discrete line spectrum: a motor's sine tones with slowly wandering phase, louder on the left."""
    hum = np.zeros(N)
    for hz, db in MOTOR_TONES:
        hum += from_db(db) * np.sqrt(2) * np.sin(2 * np.pi * hz * TIME + 1.5 * flutter(2.28, N))
    return hum * from_db([[2.5], [-4]])


def scene():
    """Superposition: one bird in its room, heard a little to the left, over the background."""
    dry_bird = chatter() + scolding() + whistling() + squeak() + ticks()
    bird = room(dry_bird, direct_db=-2, early_db=-3.5, early_t60=0.061, tail_db=-8.0, lag_s=.000045)
    return bird * from_db([[1.8], [-2.1]]) + traffic() + air_hiss() + motor_hum()


def record(dry):
    """Peak limiting and band limiting: a fast shared gain tames the loudest notes; the top is cut."""
    over = np.maximum(np.abs(dry).max(axis=0) / .98, 1)
    gain = uniform_filter1d(minimum_filter1d(1 / over, size=90), size=90)   # 90 samples, about 2 ms
    low_pass = signal.ellip(10, .1, 70, CUTOFF_HZ, fs=SR, output="sos")
    return signal.sosfilt(low_pass, dry * gain)


dry = scene()
out = record(dry)
int16_out(out)
```